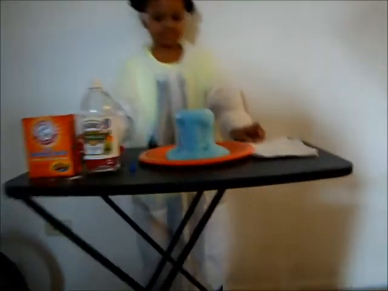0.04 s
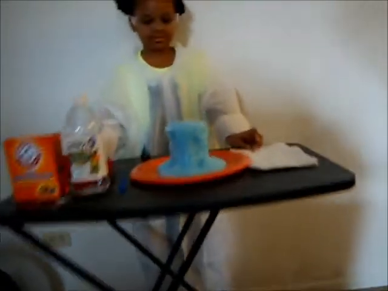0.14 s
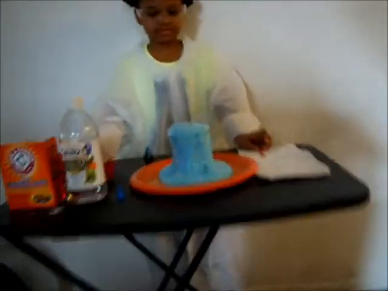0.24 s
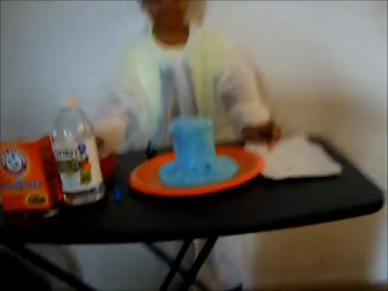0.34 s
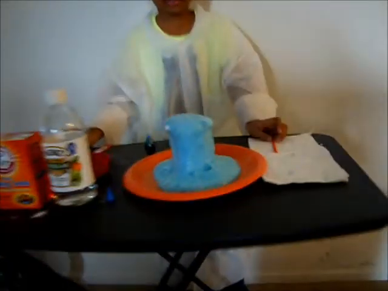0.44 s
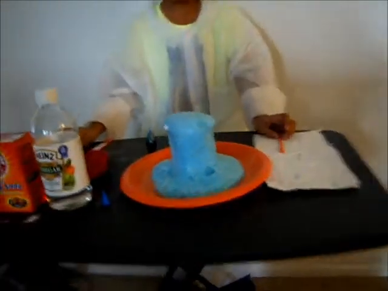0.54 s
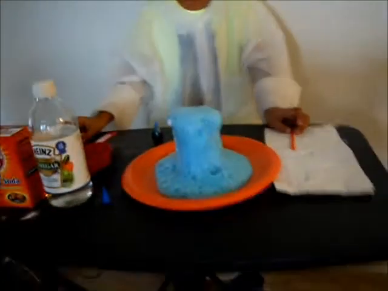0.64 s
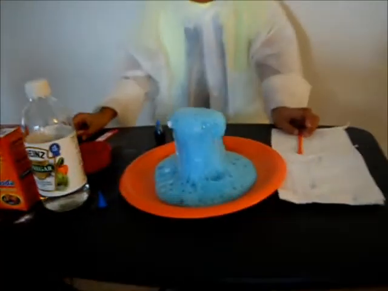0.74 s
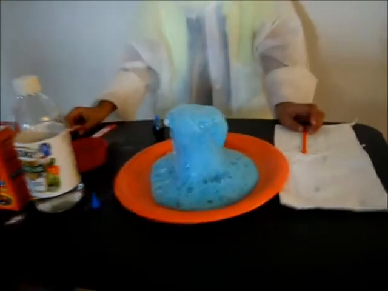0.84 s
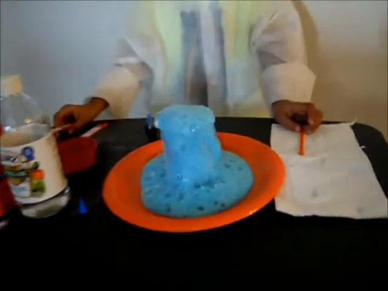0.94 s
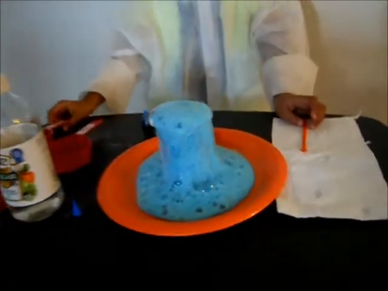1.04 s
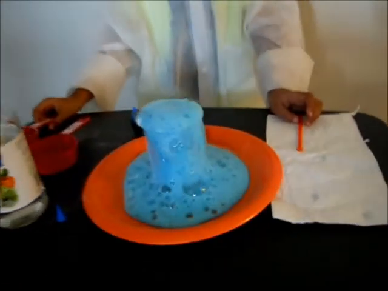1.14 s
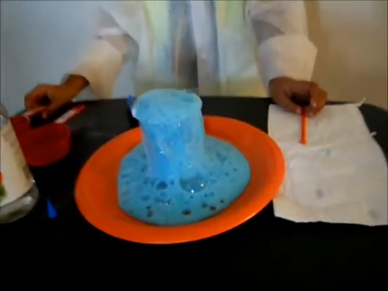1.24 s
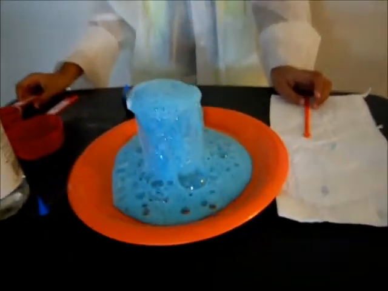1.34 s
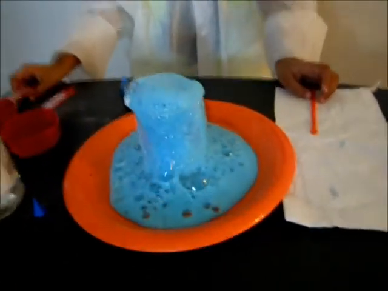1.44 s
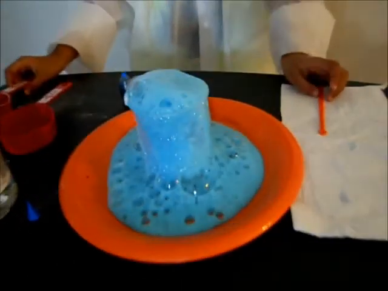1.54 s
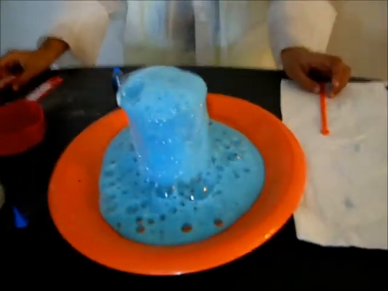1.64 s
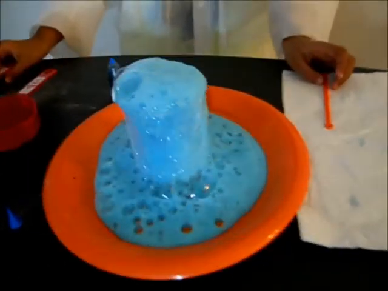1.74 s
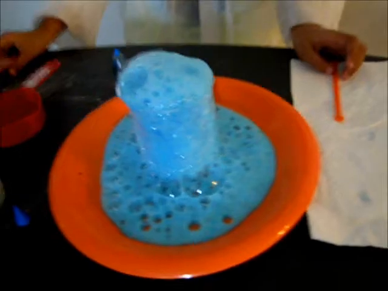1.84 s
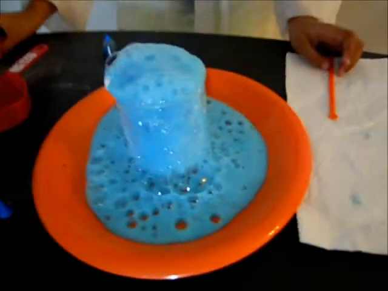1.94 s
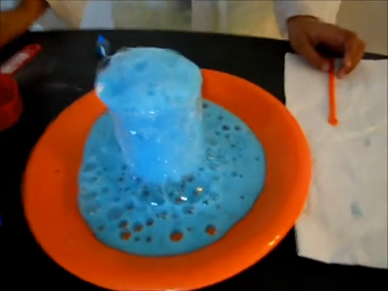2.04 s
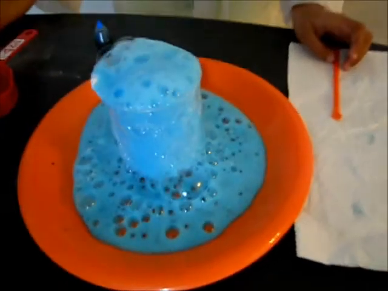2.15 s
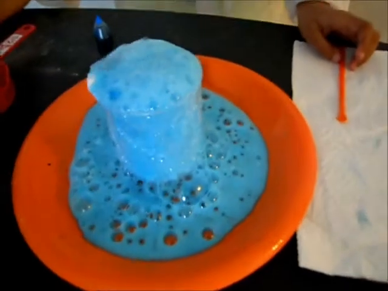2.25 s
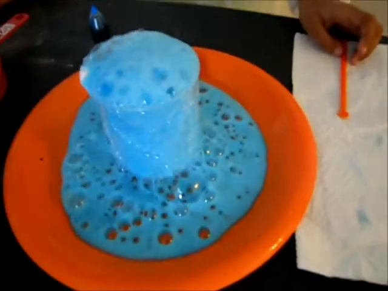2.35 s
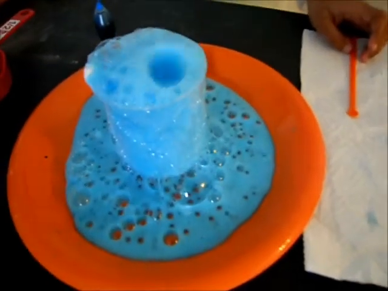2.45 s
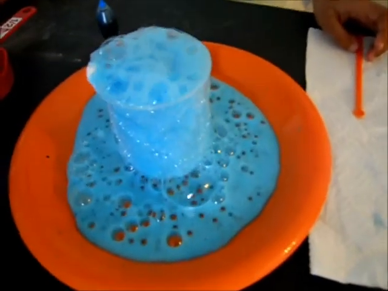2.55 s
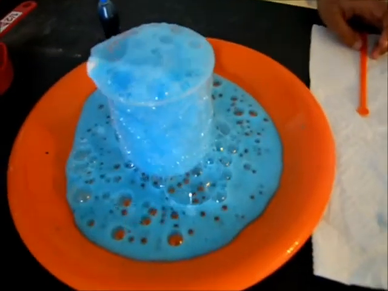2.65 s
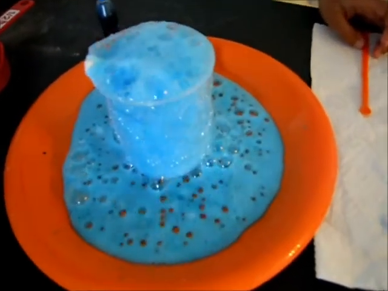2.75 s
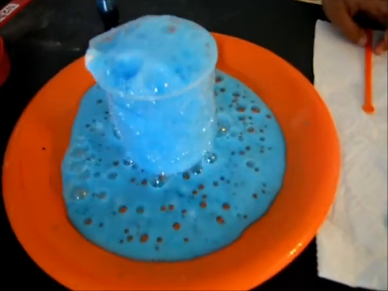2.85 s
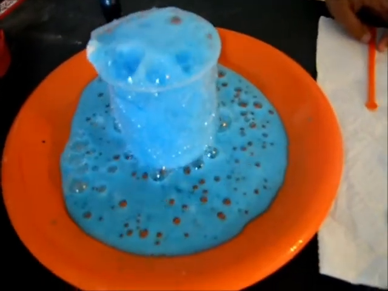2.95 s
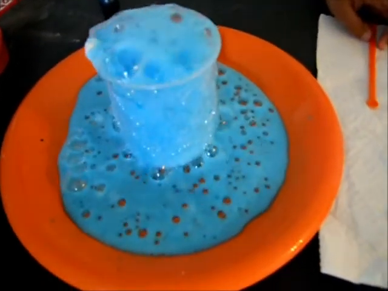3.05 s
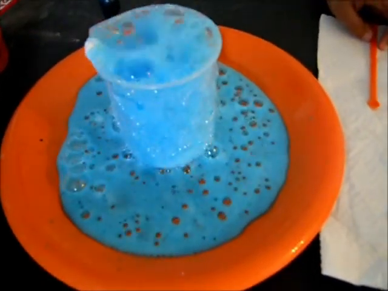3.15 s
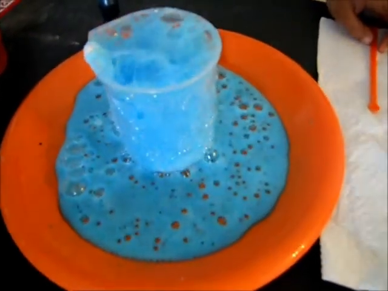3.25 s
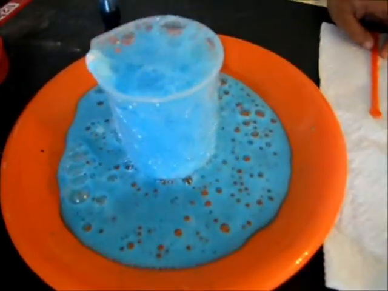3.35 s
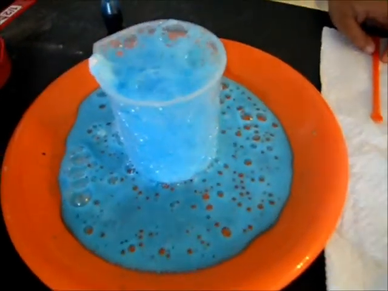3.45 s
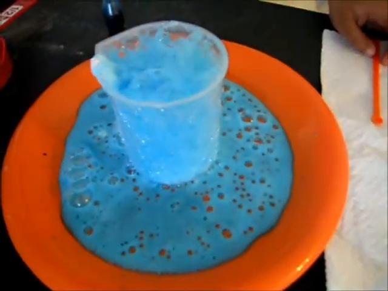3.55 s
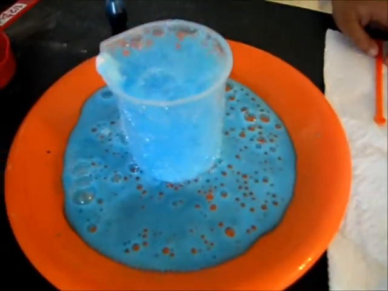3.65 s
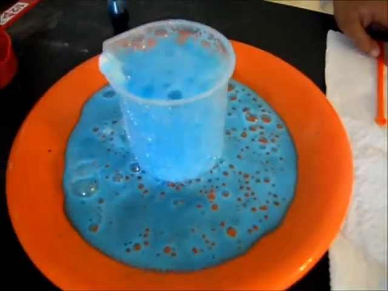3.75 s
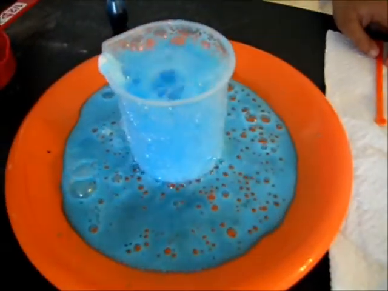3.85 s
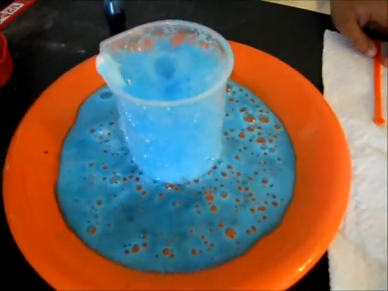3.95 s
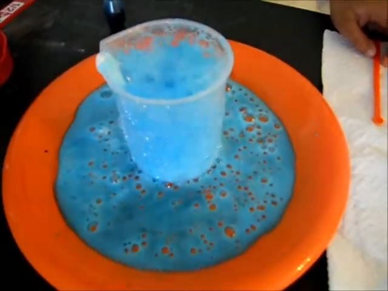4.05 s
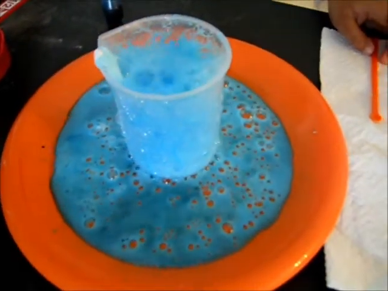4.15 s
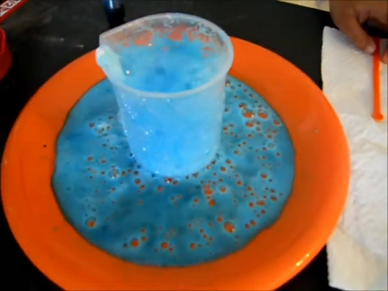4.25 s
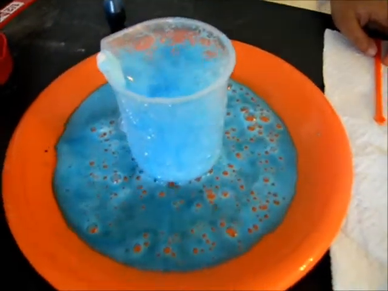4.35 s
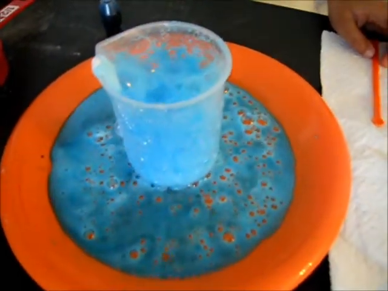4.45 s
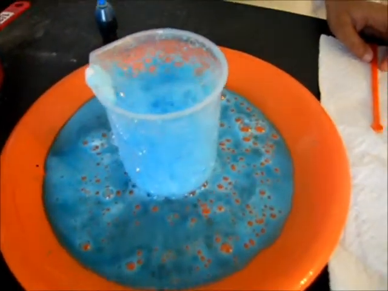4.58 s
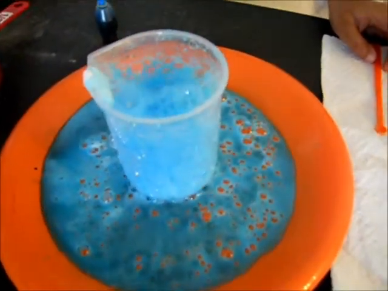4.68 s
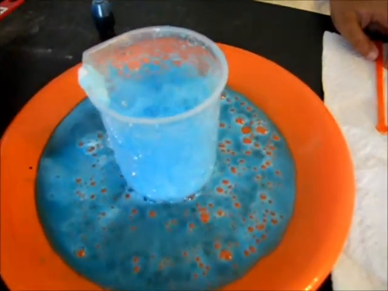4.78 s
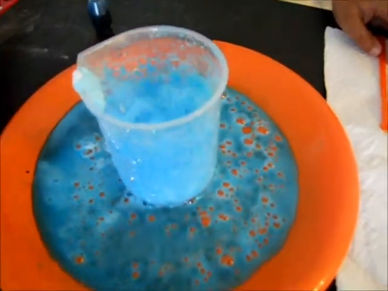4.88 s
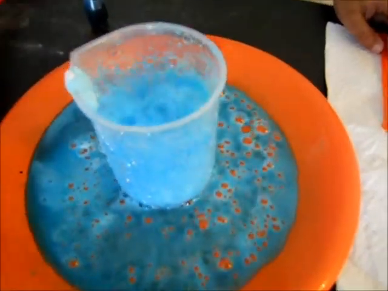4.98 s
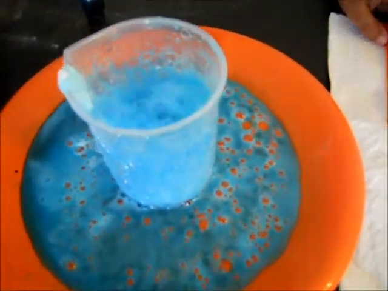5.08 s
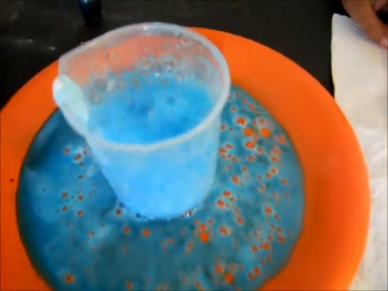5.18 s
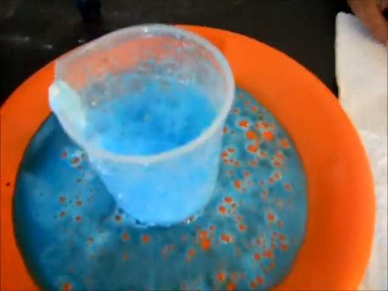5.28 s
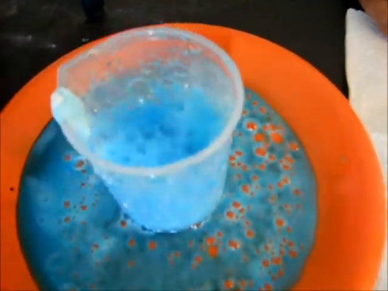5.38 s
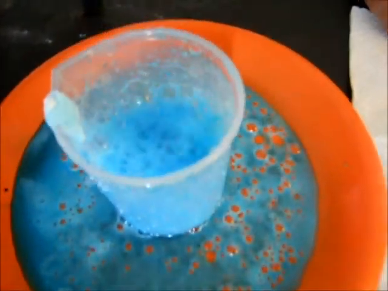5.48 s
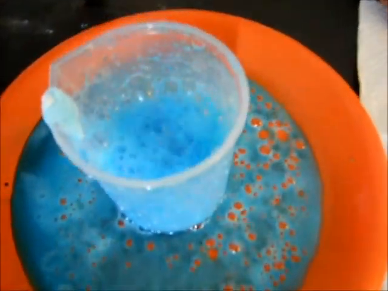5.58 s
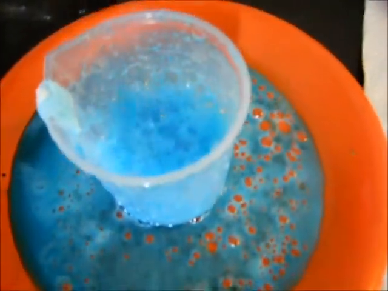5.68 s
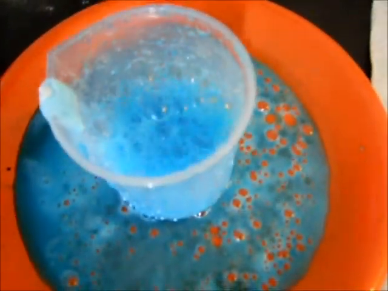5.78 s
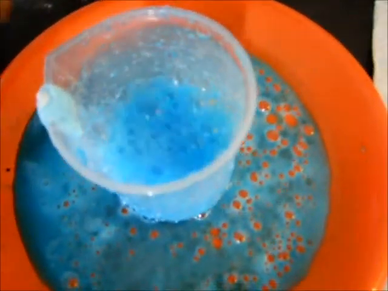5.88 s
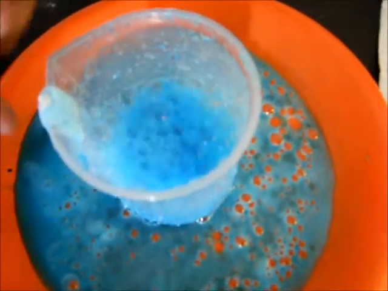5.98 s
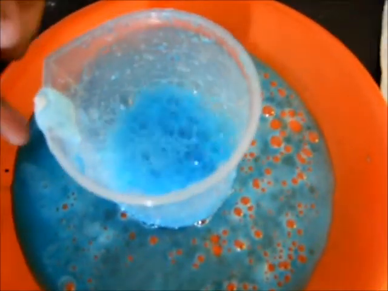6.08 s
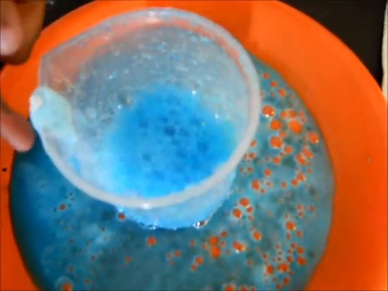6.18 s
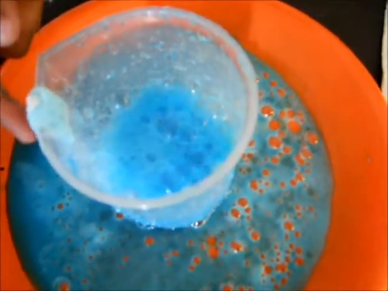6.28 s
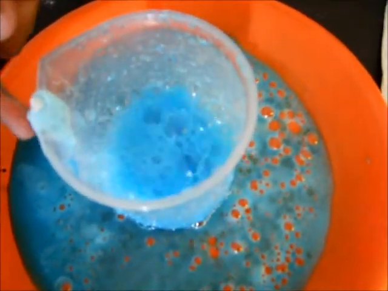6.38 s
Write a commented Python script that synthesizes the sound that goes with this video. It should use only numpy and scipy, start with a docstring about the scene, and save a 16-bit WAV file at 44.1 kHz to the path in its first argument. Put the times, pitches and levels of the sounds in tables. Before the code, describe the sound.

In a small room, two dull table knocks sound over faint, distant fizzing. The handheld microphone moves in, bumped by fingers and brushed by cloth, while the bubbling hiss grows close and dense. It peaks bright and fine, then fades to a hollow sizzle inside the cup. A sharp plastic snap and knock come during the fading, then two light knocks and a final tap on the microphone.

```python
"""Baking soda and vinegar foam over in a plastic cup on a table, in a small room; a hand-held camera moves in.
The fizz is a dense stream of random clicks, shaped by bubble size and by the air in the cup: it swells,
grows finer, then turns hollow as the foam sinks. Knocks ring the modes of the table top and stiff plastic snaps.
Fingers bump the camera body, a sleeve brushes it, and low noise and faint steady low tones lie underneath."""
import sys
import numpy as np
from scipy import signal
from scipy.fft import rfft, irfft
from scipy.io import wavfile
from scipy.ndimage import uniform_filter1d

SR = 44100
rng = np.random.default_rng(int(sys.argv[2]) if len(sys.argv) > 2 else 0)


def store_wav(level_fs):
    """Save 16-bit WAV to argv[1]."""
    pcm = np.round(np.clip(np.atleast_2d(level_fs), -1, 1) * 32767)
    wavfile.write(sys.argv[1], SR, pcm.T.astype(np.int16))


N = 283122
TIME = np.arange(N) / SR

# Bursts on the open head of foam. Each row: frequency in Hz, relative level in dB per Hz.
FOAM_SPECTRUM = [(200, -23), (700, -15.5), (1000, -13), (1500, -7.5), (2000, -3.5), (2350, -1),
                 (2650, 1.55), (2950, 0), (3250, -0.15), (3800, -2), (5000, -4), (7350, -3), (7700, -13),
                 (8000, -26.5)]


def fizz(patchy_db=0.5, head_db=2.5, head_hz=2750, head_width_hz=600):
    """Dense bursts, coloured by the mix of bubble sizes and by the air in the cup."""
    hz, t, spectrum = signal.stft(evened(bursts()), SR, nperseg=512, noverlap=384)
    large_db, middling_db, fine_db = bubble_levels(t)
    sunk = follow(SINKING, t)[1]

    # the broad peak of the foam's head fades as the foam sinks
    head_bump = np.exp(-0.5 * ((hz[:, None] - head_hz) / head_width_hz) ** 2)
    lost_head_db = head_db * sunk * head_bump
    foam_db = read(FOAM_SPECTRUM, hz)[:, None]
    shape = gain_of(foam_db - lost_head_db + cup_colour(hz[:, None], t))

    # each bubble size is levelled in its own range of pitch; its weights at the corners cross-fade the sizes
    corners_hz = [1300, 2520, 4160, 6200]
    sizes = [(900, 1700, large_db, (1, 0, 0, 0)),
             (2000, 5000, middling_db, (0, 1, 1, 0)),
             (5500, 7500, fine_db, (0, 0, 0, 1))]
    colour_db = 0
    for low_hz, high_hz, wanted_db, weights in sizes:
        in_range = (hz > low_hz) & (hz < high_hz)
        own_db = 10 * np.log10((shape[in_range] ** 2).sum(0) / len(hz))
        blend = np.interp(hz, corners_hz, weights)[:, None]
        colour_db = colour_db + blend * (wanted_db - own_db)

    # bursts cluster: smooth random patches across pitch, then across time
    patches = uniform_filter1d(rng.standard_normal(spectrum.shape), size=10, axis=0)
    clusters = evened(uniform_filter1d(patches, size=14, axis=1))
    spectrum = spectrum * shape * gain_of(colour_db + patchy_db * clusters)
    return signal.istft(spectrum, SR, nperseg=512, noverlap=384)[1][:N]


def bursts(per_s=26000, spread_db=2.5):
    """Random clicks, one for each bursting film or slipping fibre; most are tiny, a few are large."""
    size = gain_of(spread_db * np.minimum(rng.exponential(1, N), 5.5))
    sign = rng.choice([-1., 1.], N)
    happens = rng.random(N) < per_s / SR
    return size * sign * happens


# The head of foam collapses once; large, middling and fine bubbles (one row each) pass through it in their own time.
# Each row: level before in dB, at the height of the collapse in dB, after in dB (all at the reference distance),
# time of the height in seconds, lead-in in seconds, fade-out in seconds.
COLLAPSE = [(-38.5, -43, -39, 4, .65, 0.51), (-32.5, -22.5, -33, 3.19, 1.02, 0.79),
            (-38, -25.5, -34.5, 3.95, 1.41, 0.61)]
# The camera moves in on the cup. Each row: time in seconds, distance in m.
DISTANCE = [(0, 1.08), (.42, 0.81), (.8, 0.49), (1.55, 0.29), (2.4, .3), (4.6, .3), (5.4, .24),
            (6.42, 0.21)]
REFERENCE_M = 0.3


def bubble_levels(t):
    """Level (dB) of each bubble size: it follows the collapse of the foam and grows as the camera nears."""
    near_db = 20 * np.log10(REFERENCE_M / follow(DISTANCE, t)[0])
    levels = []
    for before_db, height_db, after_db, at_s, lead_s, trail_s in COLLAPSE:
        calm_db = np.where(t < at_s, before_db, after_db)
        collapse_db = (height_db - calm_db) * swell(t, at_s, lead_s, trail_s)
        levels.append(near_db + calm_db + collapse_db)
    return levels


# The empty part of the cup. Each row: time in seconds, lowest air resonance in Hz,
# share of the resonances that is heard, from 0 to 1.
SINKING = [(0, 2600, 0), (3.6, 2580, 0.13), (4.2, 2340, .3), (4.7, 1810, 0.13), (5.2, 1540, 0.2),
           (5.6, 1170, 0.5), (6.0, 1074, 0.97), (6.42, 1040, 1)]
# Air modes of the nearly empty cup. Each row: frequency in Hz before it is shifted with the lowest resonance,
# width in Hz, boost in dB at full share, power by which it follows the lowest one.
CUP_MODES = [(1160, 200, 8.5, 0.99), (1800, 450, 1.5, 0.87), (2430, 300, 2, 0.019), (3480, 560, 6, .45),
             (4050, 430, 5, 0), (5500, 120, 3, 0.049), (6800, 800, 0, -0.86)]


def cup_colour(hz, t):
    """As the foam sinks, the air column above it lengthens: its modes shift and stand out more (dB)."""
    lowest_hz, share = follow(SINKING, t)
    shift = lowest_hz / CUP_MODES[0][0]
    modes_db = 0
    for mode_hz, width_hz, db, tie in CUP_MODES:
        offset = 2 * (hz - mode_hz * shift ** tie) / width_hz
        modes_db = modes_db + db * np.exp(-0.5 * offset ** 2)
    return share * modes_db


# Knocks on the table. Each row: start in seconds, level of the ringing in dB, pitch factor,
# hardness as the highest Hz struck, tick in dB, boom in dB, boom frequency in Hz.
KNOCKS = [(0.1487, -13, 1.01, 650, -39, -32, 365), (.3355, -9.5, 0.98, 1700, -29, -29.5, 366),
          (4.394, -25, 1.17, 3000, -28, -45, 352), (4.4016, -13, 0.83, 1500, -32, -17.5, 350),
          (4.7718, -23, 0.97, 3000, -26, -31, 290), (4.926, -27, 0.96, 2980, -27, -30.5, 256)]
# Modes of the table top. Each row: frequency in Hz before the pitch factor, relative level in dB, t60 in seconds.
TABLE_MODES = [(347, -16.5, 0.035), (560, 3.5, 0.029), (614, -7, 0.024), (822, -8, 0.042),
               (998, -8.5, 0.039), (1390, -12.5, 0.025), (2250, -9, .015), (3940, -7.5, .04)]


def knocks(rise_s=0.0017, boom_t60=0.18, boom_rise_s=0.014):
    """Blows tick, ring the table top, and set a low room mode booming; soft blows hardly stir the high modes."""
    out, t = np.zeros(N), TIME[:SR // 4]
    for s, db, pitch, hard_hz, tick_db, boom_db, boom_hz in KNOCKS:
        modes = 0
        for hz, mode_db, t60 in TABLE_MODES:
            softening = np.hypot(1, hz / hard_hz)
            modes = modes + gain_of(mode_db) * ring(t, hz * pitch, t60) / softening
        body = gain_of(db) * modes * (1 - np.exp(-t / rise_s))
        tick = gain_of(tick_db) * crack(hz=[550, 2600], length_s=0.0042)
        boom = gain_of(boom_db) * ring(t, boom_hz, boom_t60) * (1 - np.exp(-t / boom_rise_s))
        add(out, s, body + tick + boom)
    return out


# Sharp plastic snaps. Each row: start in seconds, level in dB, frequency in Hz, t60 in seconds.
SNAPS = [(4.395, 3, 2600, 0.01), (4.4022, -13, 2510, 0.0092)]


def snaps(rise_s=0.0019, crack_db=-23):
    """Stiff plastic flicks with a crack and rings briefly."""
    out, t = np.zeros(N), TIME[:SR // 4]
    for s, db, hz, t60 in SNAPS:
        tone = ring(t, hz, t60) * np.minimum(t / rise_s, 1)
        contact = gain_of(crack_db) * crack(hz=[800, 1800], length_s=0.01)
        add(out, s, gain_of(db) * (tone + contact))
    return out


# The room's ring. Each row: frequency in Hz, t60 in seconds.
ROOM_T60 = [(150, 0.37), (400, 0.17), (1000, 0.25), (4000, 0.14), (8000, 0.12)]


def room(x, first_s=0.008):
    """Sparse reflections of random sign, each band dying at its own speed."""
    t = TIME[:SR // 2]
    sign = rng.choice([-1., 1.], len(t))
    arrives = rng.random(len(t)) < 2000 / SR  # about 2000 reflections per second
    taps = sign * arrives * (t > first_s)
    hz, at, spectrum = signal.stft(taps, SR, nperseg=256)
    decay = gain_of(-60 * at / read(ROOM_T60, hz)[:, None])
    tail = signal.istft(spectrum * decay, SR, nperseg=256)[1]
    return signal.fftconvolve(x, tail / np.linalg.norm(tail))[:N]


# Fingers bumping the camera. Each row: time in seconds, level in dB, frequency of its push and rebound in Hz,
# rattle of the shell in dB, sway of the hand in dB (both relative to the bump's level).
BUMPS = [(0.484, -27.5, 169, -24, -35), (1.1728, -20.5, 155, -24, -35), (1.441, -15.5, 180, -14, -24),
         (1.547, -28, 230, -15, -10), (1.575, -27, 240, -19, -12), (1.612, -17.5, 132, -13, -13),
         (1.666, -23.5, 121, -9.5, -6.5), (1.841, -26.5, 328, -7, -12), (1.969, -29, 400, -9, -18),
         (2.0609, -15, 216, -6.5, -10)]
# A tap right on the microphone: start in seconds, level in dB.
MIC_TAP = (6.312, -8)


def handling(sway_ratio=0.35, tap_s=0.0013, leak_hz=35, tick_db=-6, tick_s=0.00017):
    """A bump rocks and rattles the shell and sways the hand more slowly; a tap on the port ticks and puffs."""
    out, t = np.zeros(N), TIME[:SR // 10]
    lead_s = 1 / 50  # the push builds up before the bump's own time
    for s, db, hz, rattle_db, sway_db in BUMPS:
        phase = 2 * np.pi * hz * (t - lead_s)
        rock, sway = [2 * np.sin(p) * np.exp(-abs(p) / 2) for p in (phase, sway_ratio * phase)]
        add(out, s - lead_s, gain_of(db) * (rock + gain_of(sway_db) * sway))
        add(out, s, gain_of(db + rattle_db) * crack(hz=[400, 780], length_s=0.0074))

    s, db = MIC_TAP
    puff = np.exp(-t / tap_s) + gain_of(tick_db) * np.exp(-t / tick_s)
    leaked = band(puff, leak_hz, "highpass")
    add(out, s, gain_of(db) * band(leaked, 2500, "lowpass"))
    return out


# A sleeve brushing past the camera. Each row: time of the firmest touch in seconds, level in dB,
# swell in seconds, release in seconds, lowest Hz, highest Hz.
BRUSHES = [(.655, -35.5, 0.066, 0.026, 130, 470), (1.6, -39.5, 0.12, .11, 60, 377)]


def sleeve():
    """Cloth catches and slips many times in each stroke: a short dull rustle that swells and lets go."""
    out = np.zeros(N)
    for s, db, swell_s, release_s, low_hz, high_hz in BRUSHES:
        slips = evened(band(bursts(per_s=900, spread_db=1.0), [low_hz, high_hz], "bandpass"))
        out += gain_of(db) * swell(TIME, s, swell_s, release_s) * slips
    return out


# Colour of the low background noise. Each row: frequency in Hz, relative level in dB per Hz.
LOW_NOISE = [(20, 1.5), (55, -3), (90, -6), (160, -6.5), (250, -6), (400, -6.5), (600, -5.5), (1000, -19),
             (3000, -28), (8000, -30.5)]
# Level of the low background noise, which swells as the fizz grows. Each row: time in seconds, level in dB.
BACKGROUND_LEVEL = [(0, -49), (.8, -47.5), (1.5, -44.5), (2.6, -44), (3.5, -41), (4.4, -41.5), (5.4, -42.5),
                    (6.42, -41)]
# Faint steady low tones. Each row: frequency in Hz, level in dB rms where the background is loudest.
LOW_TONES = [(59.3, -47), (296.1, -56.5), (355.3, -51.5), (409.1, -57)]


def background(waver=0.47):
    """Low shaped noise and faint low tones whose phase wavers slightly (radians rms)."""
    colour = gain_of(read(LOW_NOISE, np.fft.rfftfreq(N, 1 / SR)))
    noise = irfft(rfft(rng.standard_normal(N)) * colour, N)
    level_db = follow(BACKGROUND_LEVEL, TIME)[0]
    tones = 0
    for hz, db in LOW_TONES:
        drift = evened(band(rng.standard_normal(N), 1.8, "lowpass"))
        tones = tones + np.sqrt(2) * gain_of(db) * np.sin(2 * np.pi * hz * TIME + waver * drift)
    return gain_of(level_db) * evened(noise) + gain_of(level_db - level_db.max()) * tones


def crack(hz, length_s):
    """A small contact: noise in one band that dies within milliseconds."""
    t = TIME[:SR // 4]
    noise = band(rng.standard_normal(len(t)), np.clip(hz, 20, SR / 3), "bandpass")
    return evened(noise) * np.exp(-t / length_s)


def ring(t, hz, t60):
    """One dying mode: a sine that falls 60 dB in t60 seconds."""
    return np.sin(2 * np.pi * hz * t) * gain_of(-60 * t / t60)


def swell(t, at_s, lead_s, trail_s):
    """A smooth hump of height one, with its own width on each side."""
    width_s = np.where(t < at_s, lead_s, trail_s)
    return np.exp(-0.5 * ((t - at_s) / width_s) ** 2)


def band(x, hz, kind, order=2):
    """Causal low-, high- or band-pass."""
    return signal.sosfilt(signal.butter(order, hz, kind, fs=SR, output="sos"), x)


def gain_of(db):
    """Decibels to amplitude."""
    return 10 ** (np.asarray(db) / 20)


def evened(x):
    """Scales to an rms of one."""
    return x / np.sqrt(np.mean(x ** 2) + 1e-20)


def read(points, hz):
    """Reads a curve over frequency on a log-frequency axis."""
    f, value = np.transpose(points)
    return np.interp(np.log(hz + 1), np.log(f + 1), value)


def follow(rows, t):
    """Reads every column of a curve table at the times t."""
    s, *columns = np.transpose(rows)
    return [np.interp(t, s, c) for c in columns]


def add(mix, s, sound):
    """Mixes a sound in at second s."""
    part = mix[round(s * SR):][:len(sound)]
    part += sound[:len(part)]


def scene(wet_db=-10, snap_wet_db=-18, far_wet_db=3):
    """One microphone, the same in both ears; knocks are wetter by far_wet_db per doubling of distance."""
    hits, snap = knocks(), snaps()
    far_db = far_wet_db * np.log2(follow(DISTANCE, TIME)[0] / REFERENCE_M)
    echo = room(gain_of(wet_db + far_db) * hits + gain_of(snap_wet_db) * snap)
    mono = fizz() + hits + snap + echo + handling() + sleeve() + background()
    return np.array([mono, mono])


def record(dry):
    """The camera's narrow band limit: a steep low-pass at 8050 Hz."""
    lowpass = signal.firwin(201, 8050, window=("kaiser", 8), fs=SR)
    return signal.oaconvolve(dry, lowpass[None], "same")


dry = scene()
out = record(dry)
store_wav(out)
```